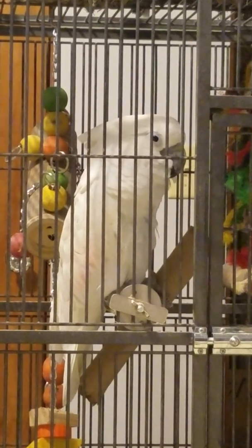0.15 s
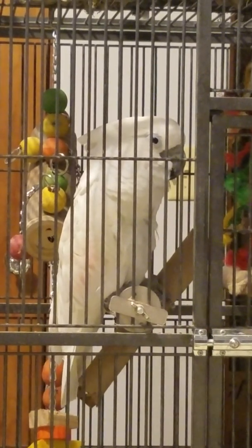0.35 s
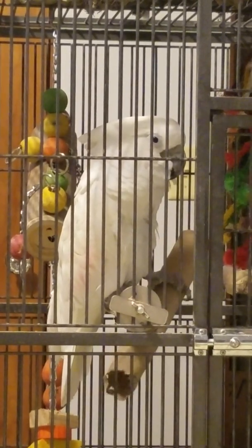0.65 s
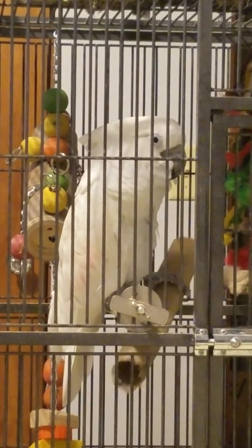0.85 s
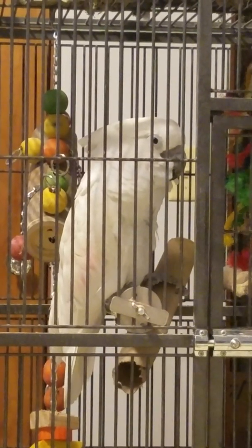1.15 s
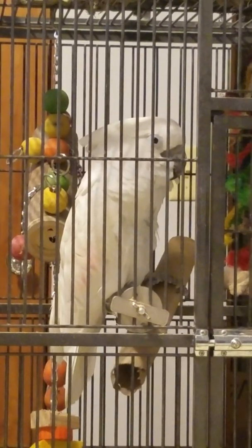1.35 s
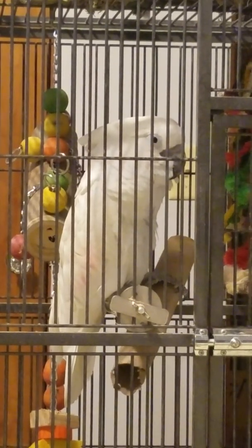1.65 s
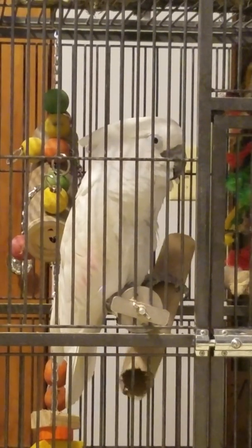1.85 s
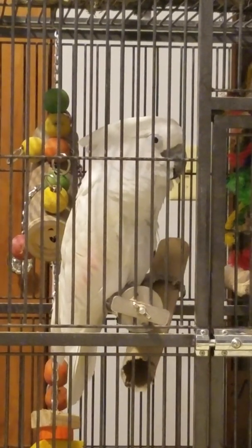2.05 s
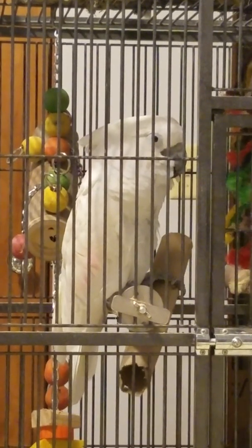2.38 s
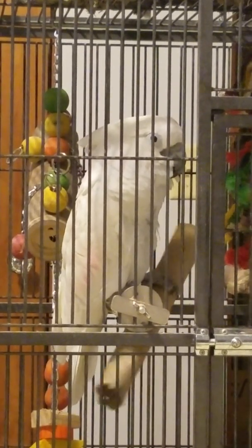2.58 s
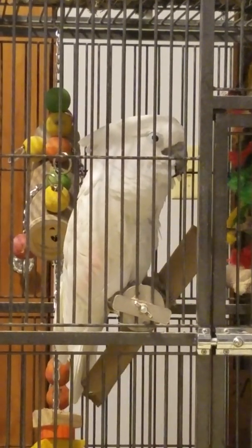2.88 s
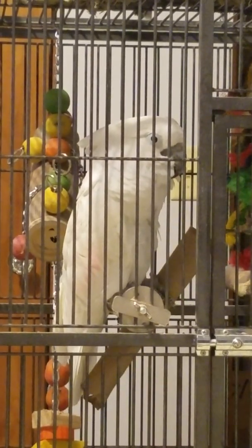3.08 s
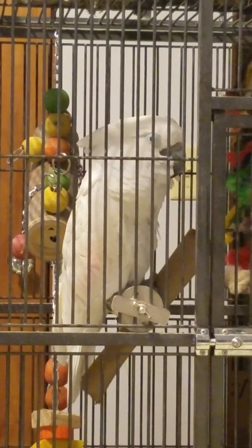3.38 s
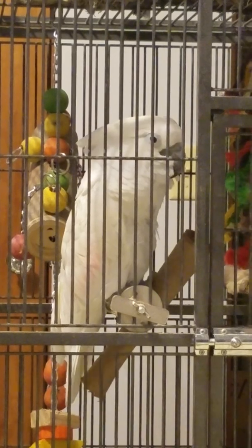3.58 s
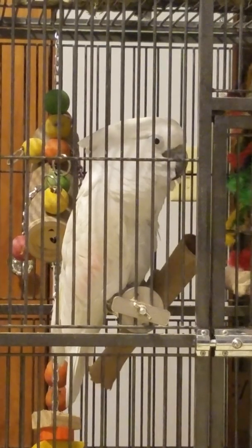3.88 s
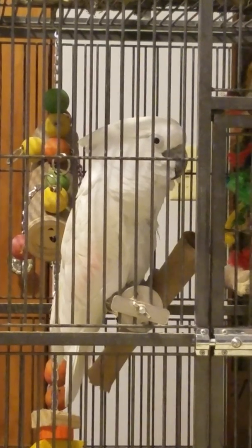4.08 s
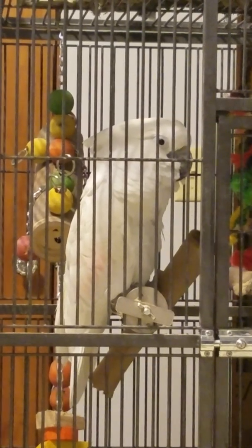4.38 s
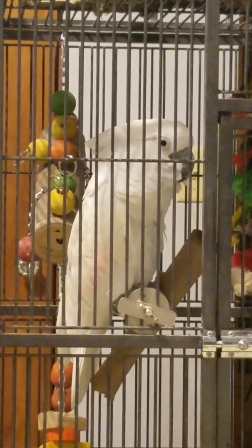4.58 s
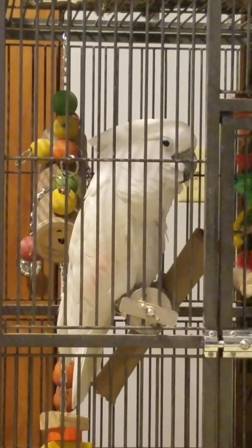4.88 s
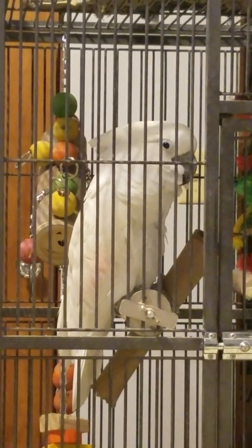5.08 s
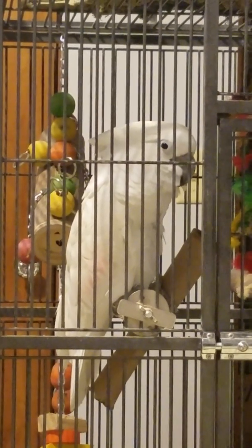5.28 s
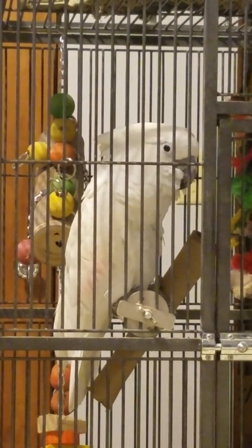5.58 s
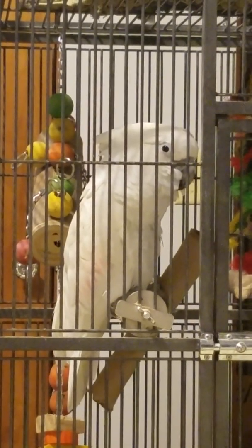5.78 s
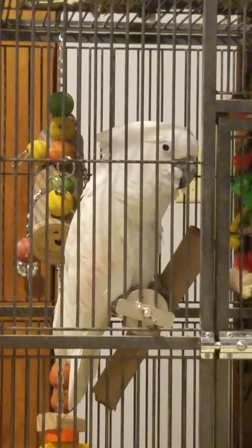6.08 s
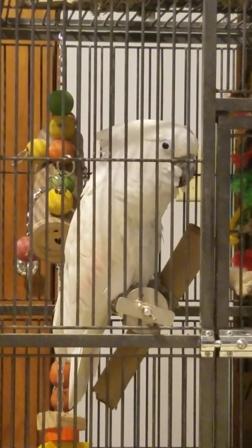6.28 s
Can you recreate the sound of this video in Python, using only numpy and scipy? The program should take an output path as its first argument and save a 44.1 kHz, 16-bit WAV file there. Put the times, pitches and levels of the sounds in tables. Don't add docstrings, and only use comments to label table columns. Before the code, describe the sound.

In a bare reverberant room, a parrot gives short clear whistles and a longer arched note, then a mellow rising call. Dull knocks follow, with one loud double clack and a tiny creak. Another bird squawks sharply upward twice with a thin squeal, and quick beak ticks patter nearby. Two more squawks close it, over soft fan noise picked up by a modest handheld microphone.

```python
import sys
import numpy as np
from scipy import signal
from scipy.fft import rfft, irfft, next_fast_len
from scipy.io import wavfile
from scipy.ndimage import uniform_filter1d

SR = 44100
rng = np.random.default_rng(int(sys.argv[2]) if len(sys.argv) > 2 else 0)


def output_pcm(signal):
    pcm = np.clip(np.atleast_2d(signal).T, -1, 1) * 32767
    wavfile.write(sys.argv[1], SR, np.round(pcm).astype(np.int16))


def ratio_of_db(decibels):
    return 10 ** (np.asarray(decibels, float) / 20)


N = 284445
T = np.arange(N) / SR


def unit(x):
    return x / np.sqrt(np.mean(x ** 2))


def colour(x, table, scale=1, lead_rad=0.):
    hz, db = np.transpose(table)
    size = next_fast_len(x.shape[-1])
    f = np.arange(size // 2 + 1) * SR / size + 1
    gain = ratio_of_db(scale * np.interp(np.log(f), np.log(hz), db)) * np.exp(1j * lead_rad)
    return irfft(rfft(x, size) * gain, size)[..., :x.shape[-1]]


def band(x, lo_hz, hi_hz):
    sos = signal.butter(2, [lo_hz, min(hi_hz, .45 * SR)], "bandpass", fs=SR, output="sos")
    return signal.sosfilt(sos, x)


def wobble(rate_hz, count):
    lowpass = signal.butter(2, rate_hz, fs=SR, output="sos")
    return unit(signal.sosfilt(lowpass, rng.standard_normal(count)))


def note(rows, fade_s=.004, lead=0):
    s, *columns = np.transpose(rows)
    first, last = int(s[0] * SR), int((s[-1] + fade_s) * SR)
    t = np.arange(first, last) / SR
    rise = np.clip((t - s[0]) / fade_s, 0, 1)
    fall = np.clip((s[-1] + fade_s - t) / fade_s, 0, 1)
    return slice(first + lead, last + lead), rise * fall, [np.interp(t, s, c) for c in columns]


def whistler():
    # (time [s], pitch [Hz], level [dB])
    whistles = [
        [(-.1, 997, -45), (-.07, 1194, -48.5), (0, 1357, -52), (.056, 1422, -49), (.064, 1327, -44.5),
         (.07, 1176, -41.5), (.078, 1050, -52)],
        [(.301, 1142, -68), (.311, 1252, -41.5), (.34, 1430, -45), (.37, 1506, -42), (.4, 1597, -48.5),
         (.412, 1690, -51.5), (.44, 1706, -45), (.451, 1217, -40), (.457, 1030, -57)],
        [(.309, 1905, -60), (.316, 1175, -46)],
        [(.582, 1157, -43), (.6, 1255, -42.5), (.63, 1309, -41), (.73, 1285, -44.5), (.78, 1198, -44),
         (.9, 1075, -44.5), (.92, 1047, -51), (.935, 930, -64)],
    ]
    fundamental_db = [-7.5, -14, -10, -12]
    tuned_hz, detuned_db_per_octave = 1230, 31.5
    lead = SR // 6
    out = np.zeros(N + lead)
    for rows, tuned_db in zip(whistles, fundamental_db):
        span, gate, (hz, db) = note(rows, lead=lead)
        first_db = tuned_db + detuned_db_per_octave * np.abs(np.log2(hz / tuned_hz))
        phase = 2 * np.pi * np.cumsum(hz * (1 + .003 * wobble(80, len(hz)))) / SR
        tone = np.sin(2 * phase) + ratio_of_db(first_db) * np.sin(phase) + .004 * np.sin(3 * phase)
        out[span] += np.sqrt(2) * gate * ratio_of_db(db) * tone
    return out


def squawk(start, low_s, high_s, held_hz, db, swell_db, drop_hz, low_over_db, high_over_db, rough):
    first_hz, break_hz = 1690, 2268
    break_s, drop_s = .02, 0.028
    high_rough = 0.663 * rough
    low_db, end_db = db - 2.5, db + swell_db
    jump = start + low_s
    end = jump + break_s + high_s
    knee_s, knee_hz = start + .3 * low_s, first_hz + .36 * (break_hz - first_hz)
    fall_db = min(db, end_db)
    return [(start, first_hz, low_db - 27.5, low_over_db + 11.0, rough),
            (knee_s, knee_hz, low_db - 7, low_over_db, rough),
            (jump, break_hz, low_db, low_over_db - 9.5, rough),
            (jump + break_s, 0.96 * held_hz, db - 1.5, high_over_db, high_rough),
            (end, held_hz, end_db, high_over_db, high_rough),
            (end + drop_s / 2, (held_hz + drop_hz) / 2, fall_db - 1.5, high_over_db, rough),
            (end + drop_s, drop_hz, fall_db - 12, high_over_db, rough)]


def squawker():
    # (start [s], low voice [s], high voice [s], held pitch [Hz], level [dB])
    calls = [
        (3.41, 0.077, 0.1, 3246, -44.5),
        (3.839, .035, .112, 3103, -45),
        (5.338, .085, 0.11, 3284, -46.5),
        (5.519, .092, .07, 3257, -43.5),
    ]
    # (swell while held [dB], pitch dropped to [Hz], low voice overtones [dB],
    # high voice overtones [dB], roughness [0-1])
    voices = [
        (-4.5, 1550, 1.5, -11.5, .34),
        (-8.5, 2300, 4.5, 5, .5),
        (1, 1480, 1, -10, .36),
        (1, 1900, 0, -16.5, 0.39),
    ]
    # (time [s], pitch [Hz], level [dB], overtones [dB], roughness [0-1])
    cries = [
        [(1.205, 1880, -56, -19, .05), (1.27, 1939, -51, -13, .08), (1.31, 2060, -43, -18, .14),
         (1.36, 2182, -38, -27, .14), (1.388, 2591, -47.5, -22, 0.05), (1.44, 2628, -55, -24, 0.13),
         (1.457, 2180, -42.5, -27, 0.01), (1.477, 1346, -61.5, -30, 0.4)],
        [(3.95, 4915, -44, -16, .5), (3.99, 4000, -40.5, -23, .04), (4.045, 3966, -50.5, -20, .04)],
        [(4.0, 2238, -52, 4, 0.46), (4.05, 2646, -50, 4.5, 0.49), (4.09, 2720, -55, 4, 0.56),
         (4.13, 2280, -74, -3, 0.7)],
    ]
    overtone_db = [2, -1, -3.5, -16]
    # (frequency [Hz], gain [dB])
    throat = [(1500, 2.5), (4500, 2), (6700, -5.5), (7300, -14.5), (8300, -2), (9300, -3), (10400, -22),
              (11500, -13.5), (12700, -11.5), (14500, -28)]
    out = np.zeros(N)
    squawks = [squawk(*call, *voice) for call, voice in zip(calls, voices)]
    for rows in squawks + cries:
        span, gate, (hz, db, over_db, rough) = note(rows)
        rough = rough + .04
        phase = 2 * np.pi * np.cumsum(hz * (1 + 0.1207 * rough * wobble(184, len(hz)))) / SR
        overtones = sum(ratio_of_db(d) * np.sin((k + 2) * phase) for k, d in enumerate(overtone_db))
        overtones = overtones * (1 + .45 * wobble(320, len(hz)))
        rasp = ratio_of_db(-9.0) * rough * unit(band(rng.standard_normal(len(hz)), 1940, 10000))
        shake = 1 + 0.31 * rough * wobble(280, len(hz))
        voice = np.sin(phase) + ratio_of_db(over_db) * overtones + rasp
        out[span] += np.sqrt(2) * gate * ratio_of_db(db) * shake * voice
    return colour(out, throat)


def knocks():
    objects = { "dull wood": ((-11, -8.5), [(.06, -70, 0.014, 940), (.375, -65, 0.031, 930),
               (.735, -61, 0.032, 730), (2.404, -61, 0.041, 800), (2.445, -64, 0.019, 990),
               (5.1, -73.5, 0.035, 1590)]), "tray": ((-6.5, -11.5), [(.922, -71.5, 0.054, 920),
               (1.285, -62, 0.041, 665), (1.822, -58, 0.035, 786), (2.058, -50.5, 0.099, 1070),
               (2.517, -59.5, 0.037, 1970), (2.585, -66.5, 0.011, 885)]), "bars": ((-2.5, -12),
               [(3.02, -69.5, 0.0068, 2240), (3.17, -75, .037, 3000), (3.22, -70.5, 0.097, 3000),
               (4.647, -69.5, 0.033, 2400)]), "hollow thud": ((-6, 3.1), [(2.061, -68, 0.07, 350),
               (2.065, -81.5, 0.025, 191), (4.95, -82, 0.015, 674), (5.15, -79, 0.018, 800),
               (6.291, -89, 0.014, 2300)])}
    out = np.zeros(N)
    t = T[:SR // 4]
    for (tilt_db, hollow_db), hits in objects.values():
        spectrum = [(250, 4 * tilt_db + 3.5), (900, -tilt_db - 7.5), (2000, 0.99),
                    (8000, 2 * tilt_db), (16000, 2 * tilt_db - 27.5)]
        for s, db, rattle_s, hollow_hz in hits:
            rattle = rng.standard_normal(len(t)) * ratio_of_db(2 * wobble(150, len(t)))
            attack = 1 - np.exp(-t / (0.021 * rattle_s))
            burst = rattle * np.exp(-(t / rattle_s) ** 2) * attack
            crack = colour(burst, spectrum)
            crack[-len(t) // 4:] = 0
            hollow = band(burst, hollow_hz / 1.205, hollow_hz * 1.196)
            sound = unit(crack) + ratio_of_db(hollow_db) * unit(hollow)
            first = int(s * SR)
            out[first:first + len(t)] += ratio_of_db(db) * sound[:N - first]
    return out


def snaps():
    # (time [s], level [dB])
    contacts = [(1.828, -36), (2.0607, -31), (2.064, -29.5), (3.011, -42), (3.014, -35), (3.018, -35),
                (3.021, -54), (4.647, -43), (4.654, -42)]
    out = np.zeros(N)
    for s, db in contacts:
        out[int(s * SR)] = ratio_of_db(db + 7)
    return band(out, 1100, 7200)


def ticks():
    # (time [s], peak level [dB])
    strikes = [(4.15, -42.5), (4.1559, -40.5), (4.2066, -52), (4.2846, -51), (4.298, -54.5),
               (4.3866, -59.5), (4.466, -53), (4.5406, -54), (4.6225, -52.5), (4.6992, -57.5),
               (4.7723, -53), (4.8544, -58), (4.9247, -58), (5.0095, -58), (5.091, -62), (5.167, -57)]
    # (frequency [Hz], level [dB], decay by 60 dB [s])
    modes = [(3830, 3, 0.0082), (4580, 8.5, 0.0035), (5720, 1.5, 0.0064), (6600, 2.5, 0.0043),
             (8440, -9.5, 0.016), (13000, -9, 0.0028)]
    out = np.zeros(N)
    t = T[:SR // 40]
    for s, db in strikes:
        ring = np.zeros(len(t))
        for hz, mode_db, t60 in modes:
            decay = ratio_of_db(mode_db + 2.5 * rng.standard_normal() - 60 * t / t60)
            ring += decay * np.sin(2 * np.pi * hz * (1 + .04 * rng.standard_normal()) * t)
        first = int(s * SR)
        out[first:first + len(t)] += ratio_of_db(db - 2.0) * (1 - np.exp(-t / 0.00022)) * ring
    return out


def creak():
    # (time [s], slip rate [Hz], level [dB])
    slips = [(2.15, 352, -55), (2.18, 354.4, -53), (2.25, 365.3, -60), (2.3, 372, -59), (2.39, 379, -61.5)]
    harmonic_db = [-3, -18, -5, -14, -20, -18]
    out = np.zeros(N)
    span, gate, (hz, db) = note(slips)
    phase = 2 * np.pi * np.cumsum(hz * (1 + 0.013 * wobble(56, len(hz)))) / SR
    tone = sum(ratio_of_db(d + 4 * wobble(15, len(hz))) * np.sin((k + 1) * phase) for k, d in enumerate(harmonic_db))
    out[span] = gate * ratio_of_db(db) * tone
    return out


def diffuse(count, alike=0.92):
    left, right, both = rng.standard_normal((3, count))
    low = signal.butter(1, 800, fs=SR)
    share = np.clip(alike, 0, 1)
    pair = np.array([left, right])
    return pair + signal.lfilter(*low, np.sqrt(share) * both + (np.sqrt(1 - share) - 1) * pair)


def room(x, direct_db, rise_s):
    # (band centre [Hz], decay by 60 dB [s])
    decays = [(250, 0.42), (700, 0.5), (1500, 0.42), (2800, 0.43), (4200, 0.39), (6500, 0.35),
              (12000, 0.32)]
    t = T[:SR // 2 + SR // 4]
    hz = np.array(decays)[:, 0]
    edges = np.r_[40, np.sqrt(hz[1:] * hz[:-1]), 18000]
    field = diffuse(len(t))
    tail = sum(band(field, lo, hi) * ratio_of_db(-60 * t / t60)
               for lo, hi, (_, t60) in zip(edges, edges[1:], decays))
    tail = tail * (1 - np.exp(-t / rise_s))
    tail = tail / np.sqrt(np.sum(tail ** 2) / 2)
    tail[:, 0] += ratio_of_db(direct_db)
    return signal.fftconvolve(x[None], tail, axes=1)[:, len(x) - N:len(x)]


def fan():
    # (frequency [Hz], density [dB per Hz])
    air_spectrum = [(15, -44), (25, -32), (48, -34.5), (120, -6.5), (166, -13.5), (236, -10.5), (326, -8),
                    (463, -3), (531, -9), (607, -10), (1890, -16.5), (2350, -19), (16000, -36.5)]
    # (frequency [Hz], level [dB])
    mains = [(60, -99.5), (120, -77.5), (240, -80), (300, -78), (360, -76.5)]
    air = colour(diffuse(N), air_spectrum)
    middle = band(air, 180, 2200)
    swell_db = -1.55 + 1.2 * wobble(1.26, N) + 1.94 * wobble(16, N)
    air = air + middle * (ratio_of_db(swell_db) - 1)
    hum = np.zeros(N)
    for hz, db in mains:
        hum += ratio_of_db(db + 2.8 * wobble(15, N)) * np.sin(2 * np.pi * hz * T + 2 * np.pi * rng.random())
    return ratio_of_db(-62.5) * unit(air) + np.sqrt(2) * hum


def scene():
    birds = room(whistler(), -4.0, 0.018) + room(squawker(), -9.5, 0.007)
    distant = room(knocks(), -1.26, 0.0085)
    near = room(ticks() + snaps() + creak(), 0.89, 0.0017) * ratio_of_db(2)
    return birds + distant + near + fan()


def low_pass(x):
    return signal.sosfilt(signal.butter(12, 16440, fs=SR, output="sos"), x)


def record(dry):
    # (frequency [Hz], left minus right [dB])
    port_difference = [(60, -24), (110, 4), (200, 1), (380, 8), (700, 6.5), (1290, 4), (2380, 6.5),
                       (4400, 4), (8120, -10.5), (15000, 5)]
    # (frequency [Hz], gain [dB])
    mic = [(4000, 0), (7000, 0), (10000, -1.5), (12800, 3.5), (15000, 6.5)]
    # (frequency [Hz], gain [dB])
    top_limit = [(15750, 0), (15900, -30)]
    left = colour(dry[0], port_difference, scale=0.56, lead_rad=1.215)
    right = colour(dry[1], port_difference, scale=-0.45)
    ports = colour(colour(np.array([left, right]), mic), top_limit)
    power = uniform_filter1d(np.mean(ports ** 2, axis=0), size=SR // 15)
    level_db = 10 * np.log10(power + 1e-12)
    ports = ports * ratio_of_db(np.clip(0.28 * (level_db + 58), 0, 4) - 2.0)
    mix = ports - .0005
    return low_pass(mix)


dry = scene()
out = record(dry)
output_pcm(out)
```